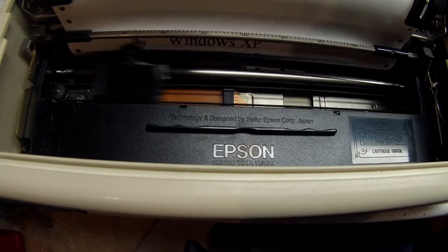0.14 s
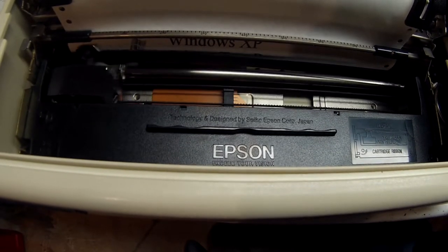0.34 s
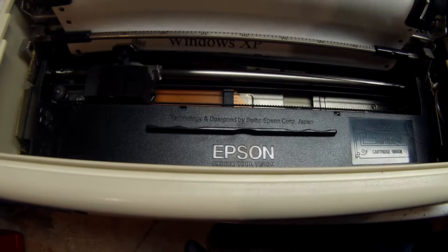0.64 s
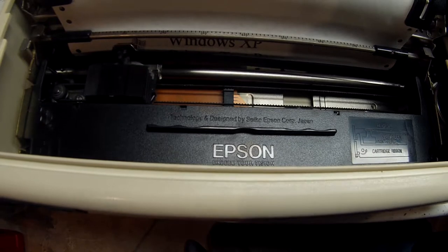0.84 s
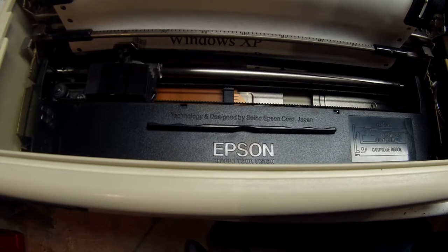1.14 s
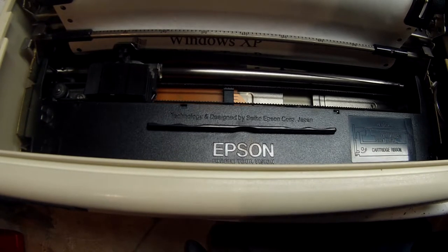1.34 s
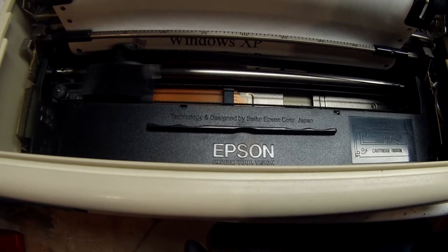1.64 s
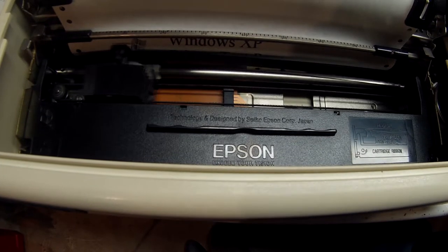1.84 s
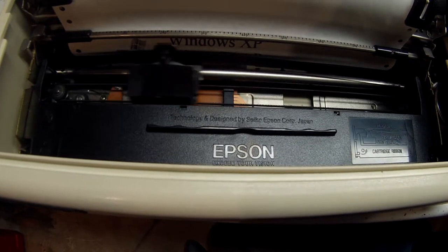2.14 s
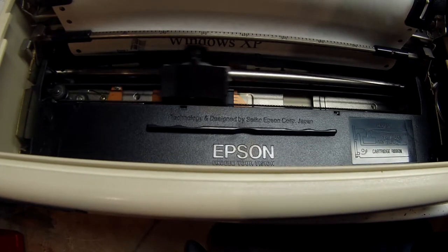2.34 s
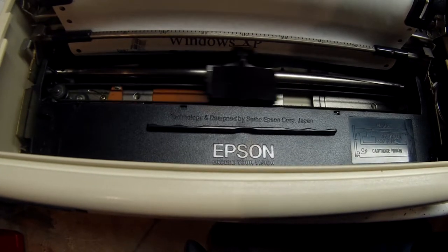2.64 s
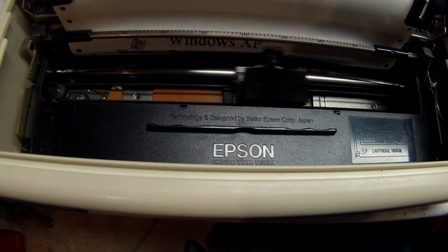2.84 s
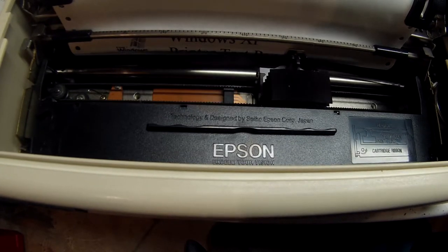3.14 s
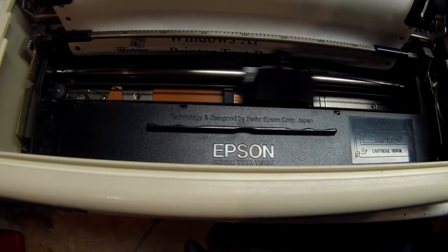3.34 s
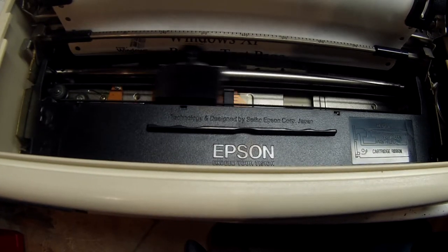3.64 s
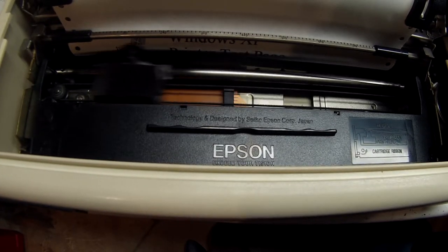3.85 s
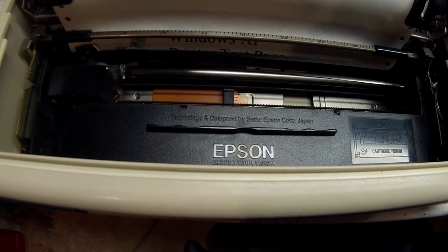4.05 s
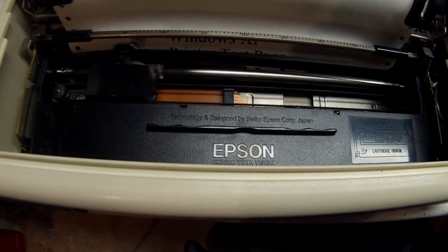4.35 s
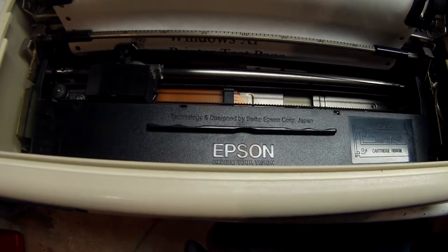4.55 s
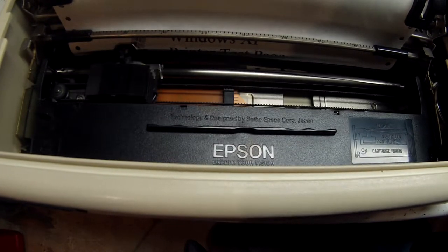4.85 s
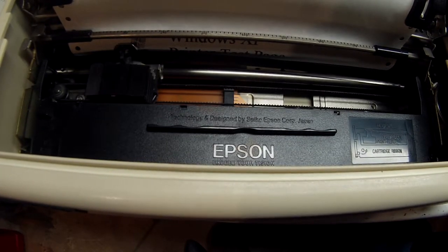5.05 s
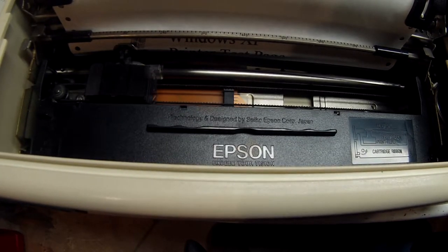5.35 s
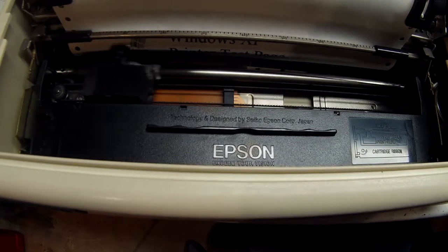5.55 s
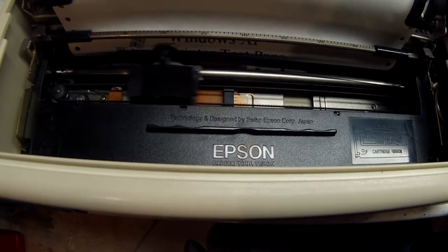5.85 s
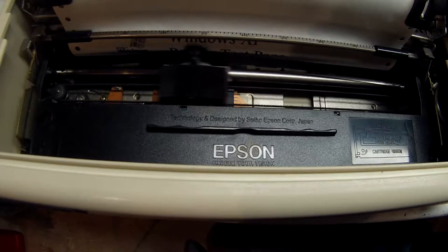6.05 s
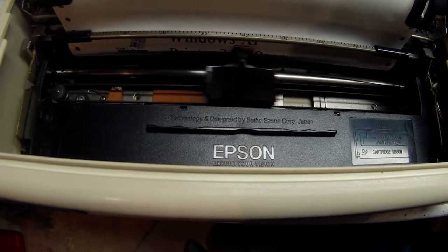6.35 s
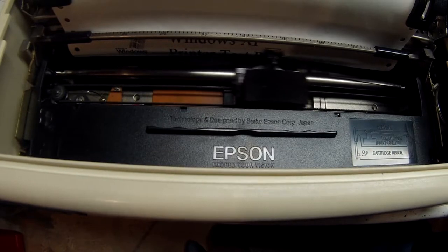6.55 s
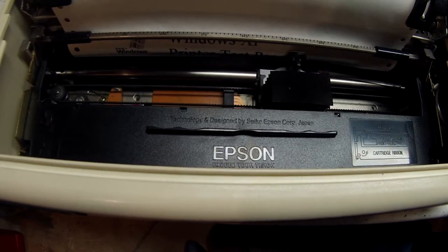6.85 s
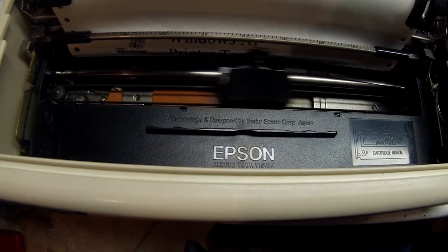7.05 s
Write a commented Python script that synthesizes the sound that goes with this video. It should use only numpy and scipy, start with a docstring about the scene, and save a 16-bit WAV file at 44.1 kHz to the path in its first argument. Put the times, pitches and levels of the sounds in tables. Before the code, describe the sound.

Close up, a dot matrix printer clunks and whirrs, then buzzes in harsh, broken metallic bursts as it prints, over a steady low motor hum.

```python
"""Indoors, close to a dot matrix printer with its lid open. Its pins strike the platen on a steady column clock,
in strokes as the letters pass: trains of clicks excite resonances of the printer's parts. Carriage and paper feed
clunk as noise bursts through case resonances; belt and gears whirr as coloured noise. An induction motor hums
throughout as a sum of steady tones, over coloured room noise with faint narrow whistles."""
import sys
import numpy as np
from scipy import signal
from scipy.fft import rfft, irfft
from scipy.io import wavfile

SR = 44100
rng = np.random.default_rng(int(sys.argv[2]) if len(sys.argv) > 2 else 0)


def file_out(sig):
    """Save sig as 16-bit WAV at sys.argv[1]."""
    # one column per channel
    cols = np.atleast_2d(sig).T
    # limit, then scale
    lim = np.clip(cols, -1, 1)
    pcm = np.round(lim * 32767).astype(np.int16)
    wavfile.write(sys.argv[1], SR, pcm)


def volts_from_decibels(level):
    """Turn decibel levels (scalar or array-like) into linear amplitude factors."""
    exponent = np.asarray(level, float) / 20
    return 10 ** exponent


N = 317066
TIME = np.arange(N) / SR

COLUMN_HZ = 474.8  # column clock; pins may also strike on the half step


def unit(x):
    """Scale to rms 1."""
    return x / np.sqrt(np.mean(x ** 2))


def ring(x, modes, order=1):
    """Sum of resonances, each applied order times for steeper skirts; signs keep neighbours from cancelling."""
    out = 0
    for k, (hz, width_hz, db) in enumerate(modes):
        section = np.concatenate(signal.iirpeak(hz, hz / width_hz, SR))
        resonance = signal.sosfilt(np.tile(section, (order, 1)), x)
        out = out + (-1) ** (k * order) * volts_from_decibels(db) * resonance
    return out


def coloured(points):
    """Noise of rms 1 with a spectrum through (Hz, dB) points."""
    hz, db = np.transpose(points)
    log_hz = np.log(np.fft.rfftfreq(N, 1 / SR) + 1)
    gain = volts_from_decibels(np.interp(log_hz, np.log(hz), db))
    return unit(irfft(rfft(rng.standard_normal(N)) * gain, N))


def add_clicks(train, when_s, size):
    """Put clicks at times between samples, each as a windowed sinc."""
    at = np.asarray(when_s) * SR
    near = np.floor(at).astype(int)[:, None] + np.arange(-7, 9)
    off = near - at[:, None]
    click = np.sinc(off) * np.cos(np.pi * off / 16) ** 2
    np.add.at(train, near, size[:, None] * click)


def case():
    """Answer of the printer to one click: the click, near echoes, dense fading ring."""
    # dense ringing of the case: t60_s, level_db (starting rms re the click)
    case_rings = [(0.028, -19), (.13, -27.5)]
    # echoes off paper and lid: delay_ms, level_db (re the click)
    echoes = [(.7, -16), (7.3, -13)]
    t = TIME[:SR // 4]
    out = np.zeros(len(t))
    for t60_s, db in case_rings:
        out += volts_from_decibels(db) * rng.standard_normal(len(t)) * np.exp(-np.log(1000) * t / t60_s)
    out[0] = 1
    for ms, db in echoes:
        out[int(ms * SR / 1000)] += volts_from_decibels(db)
    return out


def half_steps(seconds):
    """Number the half steps of the column clock within a stroke of this length."""
    return np.arange(2 * max(round(seconds * COLUMN_HZ), 1))


def strokes():
    """Every stroke as (start s, blow dB on each half step, dot pattern -1..1, pin lag ms, half step dB,
    share of scatter)."""
    # upright stems, every pin at once: start_s, blow_db
    stems = [(2.202, -16), (2.236, -17), (2.3882, -15.5), (2.558, -17), (2.7021, -15.5), (2.7663, -14.5),
             (2.8005, -16), (5.9105, -15.5), (5.9694, -16), (6.0084, -17), (6.0385, -16), (6.0691, -16.5),
             (6.096, -17), (6.1231, -16), (6.1779, -15.5), (6.2665, -15.5), (6.311, -16), (6.4095, -15.5),
             (6.4748, -16), (6.5575, -15), (6.5855, -17)]
    # bows, bars and serifs, a few pins that swell and thin out: start_s, length_ms, blow_db (at the fullest)
    bows = [(2.215, 8, -29), (2.2316, 7, -23), (2.2474, 6, -44), (2.256, 23, -20.5), (2.276, 15, -23),
            (2.2942, 19, -20.5), (2.325, 20, -20.5), (2.347, 25, -21.5), (2.3795, 9, -24), (2.4, 10, -34),
            (2.418, 26, -27.5), (2.4404, 14, -21), (2.4638, 19, -20), (2.4832, 16, -22.5), (2.532, 2, -26),
            (2.6033, 14, -24), (2.619, 10, -30), (2.629, 17, -20), (2.655, 11, -22.5), (2.666, 11, -27),
            (2.6795, 6, -20.5), (2.693, 9, -23.5), (2.824, 12, -21.5), (2.8415, 19, -22), (2.873, 14, -22),
            (2.895, 21, -21), (2.9289, 21, -26.5), (2.954, 17, -23), (5.5445, 14, -20.5), (5.5666, 14, -22),
            (5.5903, 8, -22), (5.6009, 8, -21.5), (5.9318, 13, -23), (6.133, 20, -26), (6.157, 11, -21.5),
            (6.3215, 4, -20), (6.339, 17, -22), (6.3617, 19, -21.5), (6.3799, 19, -19.5),
            (6.4881, 21, -24.5), (6.5295, 14, -18.5), (6.5416, 14, -28), (6.608, 15, -20.5),
            (6.6364, 14, -16.5), (6.6502, 19, -34), (6.67, 11, -24)]
    # shaded areas of the picture that opens each line, dense and uneven: start_s, end_s, blow_db
    shading = [(1.8298, 2.0417, -20), (5.6203, 5.688, -25), (5.694, 5.75, -26)]
    half_step_db, pin_lag_ms = -10, .07
    # many pins striking together average their scatter down to a share of it
    stem_columns, stem_half_db, stem_evenness, stem_lag_ms = 5, -13.5, .45, .015
    swell_db = 8
    # columns shaded alike; repeat of the dot pattern in columns
    grain_columns, weave_columns = 3, 7
    grain_db, shading_lag_ms = 2, .045

    rows = []
    for s, db in stems:
        rows.append((s, np.full(2 * stem_columns, float(db)), 0, stem_lag_ms, stem_half_db, stem_evenness))
    for s, ms, db in bows:
        step = half_steps(ms / 1000)
        along = (step + 1) / (len(step) + 1)
        blow_db = db - swell_db * (1 - np.sin(np.pi * along))
        rows.append((s, blow_db, 0, pin_lag_ms, half_step_db, 1))
    for s, end, db in shading:
        step = half_steps(end - s)
        grain = rng.standard_normal(256)[step // (2 * grain_columns)]
        weave = -np.cos(np.pi * step / weave_columns)
        rows.append((s, db + grain_db * grain, weave, shading_lag_ms, half_step_db, 1))
    return rows


def pins():
    """Blows on every column, weaker ones on the half step; two banks of pins, each with its own ring."""
    # resonances that a pin blow rings, part by part, each: pitch_hz, width_hz (of one filter pass), level_db
    frame_modes = [(880.7, 23.7, 19.5), (979.4, 22.5, 14), (1053, 77, 11.5), (1600, 140, 1)]
    platen_modes = [(3830, 240, 3.6), (4640, 370, 8.7), (5460, 670, 9.6)]
    thud_modes = [(448, 48, 9)]
    rib_modes = [(1425, 150, -1.5), (2023, 900, 5.5), (2206, 117, 6.5)]
    roller_modes = [(3242, 278, 6.2), (3546, 195, 8)]
    air_modes = [(9430, 1240, 2.5), (10910, 1820, 1.5), (12400, 3300, -3.5)]
    head_modes = [(6400, 1320, 3.5), (7163, 1020, 9.3), (7908, 1570, 10.5)]
    # how hard each part rings (rows: frame, platen, thud, ribs, roller, air, head): level_db (re a middling
    # blow), follow (share of the blow's dB), drift_db_per_s (of travel), picture_db (more in the picture),
    # weave_db (swing with the dot pattern)
    parts = [(2.5, 1, -9.5, -5, 4), (-3, 1.5, -1, -0.5, 5.5), (-1.5, 0.46, 2, -3, 5),
             (-6.5, 0.62, 1.5, -1, 6), (-2.5, 0.89, 3, 2.5, -1.5), (1, 0.52, -0.5, -0.5, 3.5),
             (0.84, 1, -1.5, -5.5, 3.5)]
    # the head starts a printed line, and the column clock counts from here: start_s
    passes = [1.8298, 5.5445]
    picture_s = .3  # picture width in travel time
    print_db, middling_db, first_db = 10, -21, -1
    blow_scatter_db, part_scatter_db, stroke_scatter_db = 1.8, 2.2, 1.5

    out, marks = 0, strokes()
    for bank in range(2):
        trains = np.zeros((7, N))
        for s, db, weave, lag_ms, half_db, uneven in marks:
            step = np.arange(len(db))
            chance = rng.standard_normal((9, len(step)))
            tints = rng.standard_normal(7)
            start = max(p for p in passes if p <= s + .01)
            tick = np.round((s - start) * 2 * COLUMN_HZ) + step
            # a full column lands as one blow; a few lone pins straggle
            when = start + tick / (2 * COLUMN_HZ) + lag_ms * chance[0] / 1000
            shape_db = middling_db + print_db + half_db * (step % 2) + first_db * (step == 0)
            shape_db = shape_db + blow_scatter_db * uneven * chance[1]
            # parts scatter separately, so the colour changes from blow to blow and stroke to stroke
            for train, part, luck, tint in zip(trains, parts, chance[2:], tints):
                part_db, follow, drift_db, picture_db, weave_db = part
                place_db = drift_db * (when - start) + picture_db * (s - start < picture_s) + weave_db * weave
                size_db = shape_db + part_db + follow * (db - middling_db) + place_db
                scatter_db = part_scatter_db * uneven * luck + stroke_scatter_db * tint
                add_clicks(train, when, volts_from_decibels(size_db + scatter_db))
        frame, platen, thud, ribs, roller, air, head = trains
        struck = zip((platen, ribs, roller, air, head),
                     (platen_modes, rib_modes, roller_modes, air_modes, head_modes))
        bright = sum(ring(train, modes, order=2) for train, modes in struck)
        # the low boom rings on in its own modes; the rest scatters round the case
        boom = ring(frame, frame_modes) + ring(thud, thud_modes)
        out = out + boom + signal.fftconvolve(bright, case())[:N]
    return out


def clunks():
    """Each clunk is a short rattle of noise that rings the plastic case."""
    # carriage and feed clunks: start_s, level_db (of the rattle driving the case), treble_db (re level_db)
    clunk_list = [(0.0227, -35.5, -13), (0.34, -28, -3.5), (0.3879, -28, -10), (0.6698, -30, -10.5),
                  (1.6585, -30, -5), (1.7279, -32.5, -4), (1.7743, -34, -4.5), (1.7944, -25, -19),
                  (3.0411, -25, -13), (3.0694, -48, 2), (3.1085, -44, 3.5), (3.1428, -33.5, -10),
                  (3.1694, -37, -8), (3.3245, -38.5, 4.5), (3.3564, -41.5, -3), (4.0493, -32, -1.5),
                  (4.0972, -35.5, -2), (4.1644, -43, -6), (4.3866, -42, -6), (4.8594, -53, 6),
                  (5.3748, -32.5, -1), (5.3964, -45, 3.5), (5.4472, -32, -6.5), (5.4891, -36.5, 1.5),
                  (5.5094, -36, -7), (6.7481, -26, -12), (6.7766, -30, -9.5), (6.9457, -35.5, 1.5)]
    # low and high resonances of the case, each: pitch_hz, width_hz, level_db
    case_low = [(744, 120, 21), (1790, 240, 9.5), (2030, 280, 7)]
    case_high = [(2740, 530, 2), (3600, 300, 6.5), (4700, 260, 2), (8000, 4800, -20)]
    # brighter clunks rattle longer: decay time and its growth with treble
    rattle_ms, rattle_ms_per_db = 6.3, 0.38
    # the low body of a clunk builds up and lasts longer than its tick
    boom_stretch, boom_rise_ms = 1.5, 1.5

    low, high = np.zeros(N), np.zeros(N)
    t_ms = 1000 * TIME[:SR // 10]
    for s, db, treble_db in clunk_list:
        at = int(s * SR)
        span = slice(at, at + len(t_ms))
        decay_ms = max(rattle_ms + rattle_ms_per_db * treble_db, 1)
        rattle = volts_from_decibels(db) * rng.standard_normal(len(t_ms))
        rise = 1 - np.exp(-t_ms / boom_rise_ms)
        low[span] += rattle * np.exp(-t_ms / (decay_ms * boom_stretch)) * rise
        high[span] += volts_from_decibels(treble_db) * rattle * np.exp(-t_ms / decay_ms)
    return signal.fftconvolve(ring(low, case_low) + ring(high, case_high), case())[:N]


def carriage():
    """Belt and gear whirr, and the swish of the head braking on its rail: coloured noise under level curves."""
    # whirr of the belt in three groups, joined by straight lines in dB: time_s, level_db (rms)
    whirr_groups = [
        [(0.0, -62), (0.376, -53), (1.098, -73), (1.322, -60), (1.708, -56), (1.8, -52)],
        [(3.04, -57), (3.14, -63), (3.66, -60), (4.09, -51.5), (4.43, -66), (5.26, -65), (5.44, -57),
         (5.52, -58)],
        [(6.74, -64), (6.924, -60), (7.19, -57)],
    ]
    # spectrum of the whirr: pitch_hz, level_db (relative)
    whirr_colour = [(300, -65), (750, 16.5), (1400, -9.5), (2100, 3.5), (3200, 1.5), (5000, -12.5),
                    (9000, -16), (15000, -41)]
    # head braking on its rail: middle_s, width_s, level_db (rms at the middle)
    swishes = [(.25, 0.1, -53.5), (3.99, .07, -60)]
    # spectrum of the swish: pitch_hz, level_db (relative)
    swish_colour = [(1500, -25), (3500, -2), (6000, 0), (9000, -2), (12000, -8), (15000, -18)]
    s, whirr_db = np.concatenate(whirr_groups).T
    whirr = volts_from_decibels(np.interp(TIME, s, whirr_db)) * coloured(whirr_colour)
    swell = sum(volts_from_decibels(db) * np.exp(-(2 * (TIME - mid) / width_s) ** 2) for mid, width_s, db in swishes)
    return whirr + swell * coloured(swish_colour)


def motor():
    """Shaft turns a little under mains speed, so its lines beat slowly against those of the poles."""
    # lines of the shaft: multiple (of the shaft rate), level_db (rms)
    shaft = [(1, -37), (2, -43.5), (3, -42), (4, -47.5), (5, -46.5), (6, -54.5), (7, -63), (9, -52.5),
             (11, -56.5), (12, -58.5), (13, -65)]
    # lines of the poles: multiple (of the mains rate), level_db (rms)
    poles = [(2, -52.5), (4, -58), (8, -58), (12, -59.5)]
    # shaft multiples riding on twice the mains: multiple, level_db (rms)
    slip = [(2, -56), (3, -59), (7, -68), (10, -48.5)]
    # further steady low tones: pitch_hz, level_db (rms)
    drones = [(44.5, -59), (193.44, -54), (256.53, -58), (315.2, -62.5)]
    # thin steady tones of the motor: pitch_hz, level_db (rms)
    whine = [(2110, -69), (2250, -66), (5329, -74), (5959, -78), (6352, -75), (6471, -72), (6611, -74),
             (6729, -79), (7122, -80), (7499, -82), (7892, -80), (8010, -80), (8150, -80), (8409, -82),
             (8522, -81), (9039, -79), (9238, -81), (9432, -80), (9690, -79), (10890, -82), (11483, -82),
             (11999, -84), (12430, -80), (12769, -77)]
    shaft_hz, mains_hz = 58.705, 60.005
    in_step_s = 3.638  # moment when shaft and poles pull together

    t = TIME - in_step_s
    lines = [(k, k * shaft_hz, db) for k, db in shaft] + [(k, k * mains_hz, db) for k, db in poles]
    out = np.zeros(N)
    loose = []
    for k, hz, db in lines:
        if k < 6:
            # low multiples move in step, the third pulling against the rest
            out += (-1 if k == 3 else 1) * volts_from_decibels(db) * np.cos(2 * np.pi * hz * t)
        else:
            loose.append((hz, db))
    loose += [(k * shaft_hz + 2 * mains_hz, db) for k, db in slip] + drones + whine
    # the others start at any phase
    for hz, db in loose:
        out += volts_from_decibels(db) * np.cos(2 * np.pi * (hz * t + rng.random()))
    return np.sqrt(2) * out  # levels are rms


def room():
    """Broad coloured noise with narrow bands of resonated hiss on top."""
    # spectrum of the room noise: pitch_hz, level_db (per Hz, relative)
    room_colour = [(12, -30), (20, 4), (53, -7), (104, -1.5), (177, -1), (301, -1), (434, -7), (718, -10),
                   (1290, -48), (2200, -48), (3840, -53), (6540, -33), (12400, -34), (14700, -42),
                   (16000, -76)]
    # whistling narrow hiss bands: pitch_hz, width_hz, level_db (rms)
    whistles = [(523, 68, -47.5), (736, 93, -44.5), (1098, 31, -58.5), (1970, 180, -61.5),
                (5260, 350, -70.5), (6270, 280, -72), (9270, 160, -76), (12400, 80, -78), (12800, 150, -75)]
    room_db = -43.5  # rms
    bands = np.zeros(N)
    for hz, width_hz, db in whistles:
        bands += volts_from_decibels(db) * unit(ring(rng.standard_normal(N), [(hz, width_hz, 0)]))
    return volts_from_decibels(room_db) * coloured(room_colour) + bands


def scene():
    """All sources at one microphone."""
    return (pins() + clunks() + carriage() + motor() + room())[None]


def roll_off(x):
    """The treble ends steeply here."""
    return signal.sosfilt(signal.butter(12, 16510, fs=SR, output="sos"), x)


def record(dry):
    """A steep elliptic low-pass cuts the top of the treble."""
    top_hz = 15250
    low_pass = signal.ellip(8, .3, 45, top_hz, fs=SR, output="sos")
    mix = signal.sosfilt(low_pass, dry)
    return roll_off(mix)


dry = scene()
out = record(dry)
file_out(out)
```